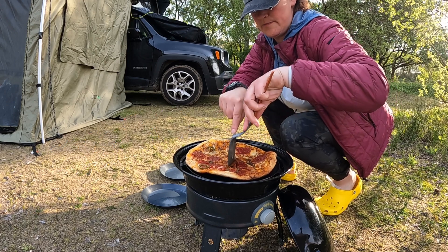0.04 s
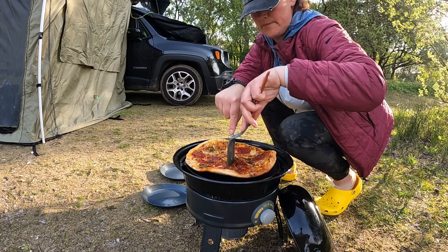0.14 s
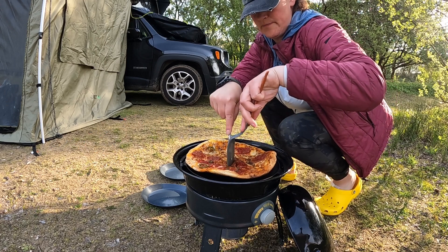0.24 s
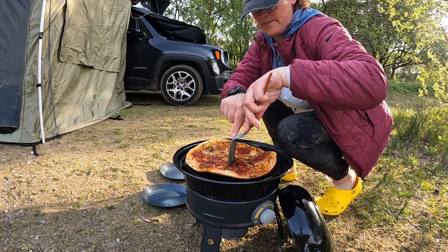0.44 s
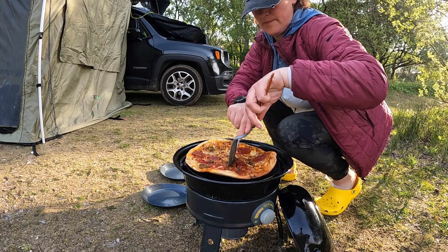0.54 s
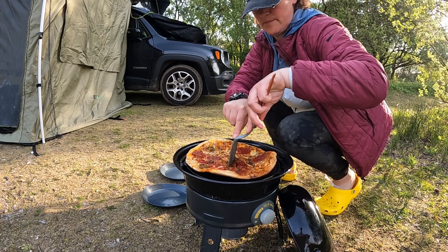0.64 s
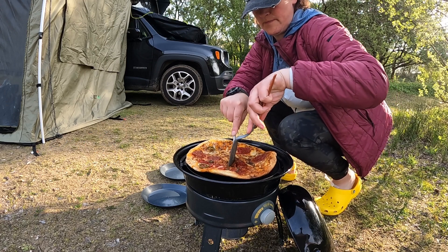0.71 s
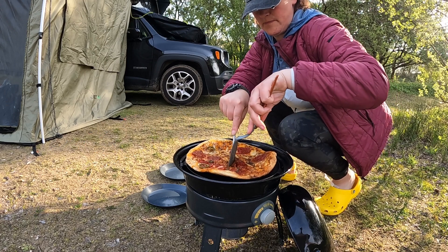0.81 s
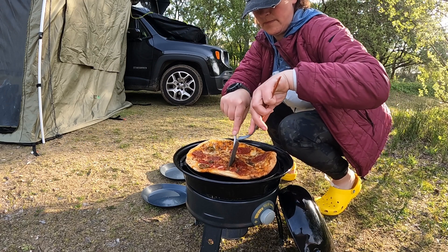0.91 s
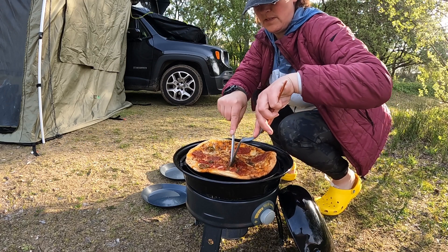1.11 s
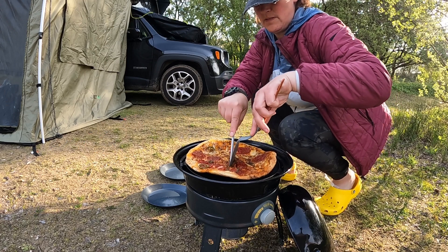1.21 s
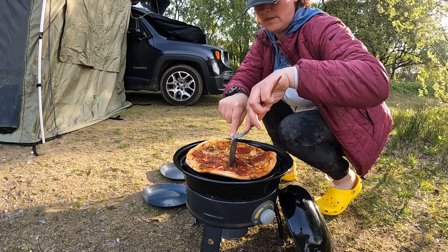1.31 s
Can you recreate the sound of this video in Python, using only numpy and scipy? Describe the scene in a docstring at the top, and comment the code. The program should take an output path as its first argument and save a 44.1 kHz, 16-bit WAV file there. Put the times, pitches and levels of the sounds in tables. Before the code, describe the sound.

A knife cracks through a hard, burnt pizza crust with sharp crunching snaps and pan knocks outdoors

```python
"""A knife is pushed through a burnt pizza on a camping grill, close to the microphone, outdoors.
The crust crackles and snaps as filtered pulses and grains; the blade rasps and knocks on the ringing pan.
Light sawing, made of the same grains, and two crumb ticks follow.
Behind lie a steady hiss of coloured noise and small birds far off, whistled as gliding sines.
A faint steady noise of opposite sign in left and right lies under it all."""
import sys
import numpy as np
from scipy import signal
from scipy.fft import rfft, irfft
from scipy.io import wavfile

SR = 44100
rng = np.random.default_rng(int(sys.argv[2]) if len(sys.argv) > 2 else 0)


def bounce(signal):
    """Save signal as a 16-bit WAV file at the path given by the first command-line argument."""
    frames = np.transpose(np.atleast_2d(signal))
    limited = np.clip(frames, -1, 1)
    pcm = np.round(limited * 32767).astype(np.int16)
    wavfile.write(sys.argv[1], SR, pcm)


N = 59535
T = np.arange(N) / SR

# Spectrum of the outdoor hiss. Each row: frequency [Hz], relative density [dB per Hz].
AIR_SPECTRUM = [(25, -16), (60, -28), (105, -23), (165, -5.5), (350, -1.5), (620, 3), (900, -1.5),
                (2300, -2), (3600, -7.5), (6500, -11), (10500, -13), (15000, -39)]
# Level of the hiss over time. Each row: time [s], level [dB].
AIR_LEVEL = [(0, -42.5), (0.2, -41), (0.42, -46.5), (0.75, -45.5), (0.92, -47), (1.02, -44.5), (1.2, -44),
             (1.35, -46.5)]
# Spectrum of the faint side noise. Each row: frequency [Hz], relative density [dB per Hz].
SIDE_NOISE_SPECTRUM = [(25, -3), (100, -8), (300, -6), (700, -13), (5000, -33), (10000, -9), (12500, 11),
                       (14500, -16)]
SIDE_NOISE_DB = -68

# Level of the crumbling in the main cut. Each row: time [s], level [dB].
CUT_LEVEL = [(0.0, -52), (0.11, -49), (0.15, -42.5), (0.2, -43), (0.223, -36.5), (0.229, -23), (0.237, -31),
             (0.241, -18.5), (0.256, -26.5), (0.273, -33), (0.277, -15), (0.287, -27.5), (0.297, -29.5),
             (0.33, -39), (0.42, -55), (0.5, -54)]
# Light sawing strokes. Each row: start [s], length before the release [s], level [dB].
STROKES = [(0.543, 0.041, -45), (0.602, 0.072, -46.5), (0.741, 0.087, -47), (1.01, 0.067, -49.5),
           (1.12, 0.074, -50.5)]
STROKE_ATTACK_S, STROKE_RELEASE_S = 0.0095, 0.016
# Colour of the crumbling crust. Each row: frequency [Hz], relative level [dB].
CRUMBLE_COLOUR = [(120, -30), (250, -12), (700, -7), (1700, -2.5), (2400, 2.5), (3200, 4.5), (4800, 1.5),
                  (7200, 1.5), (10500, -4.5), (15000, -29)]
GRAINS_PER_S, GRAIN_SPREAD_DB, GRAIN_PAN_DB = 5000, 3, -10
# Once the hard top has broken, the softer base crumbles more dully.
BREAK_S, DULLING_S, BASE_TOP_HZ, BASE_SHARE = 0.271, 0.0078, 5200, 0.54

# Rubs and catches of the blade. Each row: start [s], length [s], pitch [Hz], level [dB].
RASPS = [(0.151, 0.0077, 2240, -39), (0.163, 0.017, 2530, -44), (0.2627, 0.00425, 1474, -21),
         (0.264, 0.0057, 2400, -31), (0.2791, 0.0025, 2750, -22.5), (0.284, 0.0052, 4220, -22.5),
         (0.2845, 0.0034, 3100, -29.5), (0.488, .006, 2340, -45.5), (0.559, 0.011, 2230, -43.5),
         (0.574, 0.0055, 4850, -40), (0.625, 0.023, 3200, -50.5), (0.662, 0.0084, 4330, -45),
         (0.742, 0.02, 1440, -46), (0.762, 0.011, 2520, -46), (0.787, 0.0069, 2200, -42)]
# Colour of the rasping grit. Each row: frequency [Hz], relative level [dB].
GRIT_COLOUR = [(150, -24.5), (500, 2.5), (1600, 2), (2400, -2.5), (4800, -4.5), (7000, -13), (14000, -29)]
RASP_Q, RASP_GRIT_DB = 9, -6  # grit level is relative to the rasp's tone

# Pulses of the crust snaps and crumb ticks, some overlapping in one snap or tick.
# Each row: time [s], peak [dB], pitch [Hz], drive into the pan relative to the peak [dB].
SNAPS = [(0.2057, -16.5, 4900, 4), (0.2118, -8, 5300, 4.5), (0.2251, -10, 3540, 3.5),
         (0.2285, -25, 5000, -1), (0.2308, -34, 4500, -3), (0.235, -17, 4000, 9), (0.2387, -13, 5500, 16.5),
         (0.2411, -19, 3200, 11), (0.2448, -11.5, 3300, 13), (0.2597, -15, 3120, -25),
         (0.2610, -3, 4740, 11), (0.2613, 0.5, 2900, 1.5), (0.263, -17.5, 1980, 0), (0.302, -16.5, 3080, 4),
         (0.3127, -21, 2780, -9), (0.983, -18.5, 3040, 0), (0.9831, -19.5, 7760, -20),
         (1.0688, -15.5, 4700, -22)]
CRACK_Q, SCATTER_DB, SCATTER_T60_S = 2.61, -7, 0.015

# Knocks of the blade onto the pan. Each row: time [s], clack peak [dB], pitch [Hz], push into the thud [dB].
KNOCKS = [(0.2385, -16, 2430, -31), (0.2618, -19, 1460, -24), (0.2748, -3.5, 3130, -17),
          (0.2792, -2.5, 2650, -29.5)]
# Colour of the thud noise. Each row: frequency [Hz], relative level [dB].
THUD_COLOUR = [(100, -19), (160, -10), (220, -2), (450, 7), (650, -5), (950, 6), (1300, -7), (2500, -7),
               (6000, -16)]
THUD_T60_S, THUD_NOISE_DB, KNOCK_PAN_DB = 0.049, -8, -2
# Ringing modes of the pan and blade. Each row: frequency [Hz], level [dB], decay by 60 dB [s].
PAN_MODES = [(887.5, -34, 0.11), (1231, -36.5, 0.17), (1500, -31.5, .06), (1540, -38, 0.05),
             (2240, -41, 0.16), (2249.6, -25, 0.085), (2395, -27.5, .1), (2540, -61, 0.091),
             (2850, -38.5, 0.21), (2869, -35.5, 0.16), (3145, -34, 0.082), (3710, -48, 0.078),
             (4000, -61, 0.081), (4440, -35.5, 0.13)]
# Low modes of the grill under the pan. Each row: frequency [Hz], level [dB], decay by 60 dB [s].
GRILL_MODES = [(203, -16, 0.062), (333, -8, 0.065), (435, -30, 0.14), (583, -10.5, 0.047),
               (680, -8.5, 0.059), (891, -12.5, 0.12), (950, -16, 0.073), (1430, -18, 0.068)]

# Calls of far birds. Each row: start [s], length [s], pitch [Hz], steady glide over the call [Hz],
# closing flick [Hz], level [dB].
CHIRPS = [(0.357, 0.094, 2607, -220, -3, -46.5), (0.493, 0.053, 2600, 356, 0, -49.5),
          (0.918, 0.025, 4550, -7, 0, -51), (1.038, 0.053, 4400, 53, 0, -43),
          (1.164, 0.065, 4310, 111, 350, -46.5), (1.288, 0.061, 4440, -73, 850, -38.5)]
FLICK_POWER = 5.5  # a high power holds the flick back until the end of the call

# The microphone: two close ports, a notch, a soft top and a steep end of the band.
PORTS_DIFFER_HZ, PORTS_DIFFER_DB = 6350, -21
MIC_NOTCH_HZ, MIC_NOTCH_Q, MIC_NOTCH_SHARE = 8730, 2.53, 0.83
MIC_TOP_HZ, MIC_EDGE_HZ, CUTOFF_HZ = 8070, 20000, 15700
LEFT_RIGHT = np.array([[1], [-1]])  # opposite sign in the two channels


def from_db(db):
    """Decibels to gain."""
    return 10 ** (np.asarray(db) / 20)


def rms_one(x):
    """Scale to unit rms."""
    return x / np.sqrt(np.mean(x ** 2) + 1e-20)


def level(rows):
    """Gain over time, interpolated in dB between (s, dB) points."""
    times, db = np.transpose(rows)
    return from_db(np.interp(T, times, db))


def click(s):
    """A unit impulse at a time in seconds."""
    return (np.arange(N) == int(s * SR)) * 1.0


def dying(t60):
    """An exponential decay from time zero, falling 60 dB in t60 seconds."""
    return np.exp(-np.log(1000) * T / t60)


def through(x, response):
    """Play a sound through an impulse response."""
    return signal.fftconvolve(x, response)[:N]


def lowpass(order, hz):
    """Sections of a Butterworth low-pass."""
    return signal.butter(order, hz, fs=SR, output="sos")


def colour(x, points):
    """Causal (minimum-phase) filter with a (Hz, dB) curve and unit power gain."""
    size = 4096
    hz, db = np.transpose(points)
    grid = np.maximum(np.arange(size // 2 + 1) * SR / size, 1)
    gain = from_db(np.interp(np.log(grid), np.log(hz), db))
    # Folding the cepstrum onto positive time gives minimum phase.
    cepstrum = irfft(np.log(gain))
    cepstrum[1:size // 2] *= 2
    cepstrum[size // 2 + 1:] = 0
    response = irfft(np.exp(rfft(cepstrum)))
    return through(x, response / np.linalg.norm(response))


def modes(drive, table):
    """Ring a table of decaying sine modes, alternating in polarity."""
    response = np.zeros(N)
    for k, (hz, db, t60) in enumerate(table):
        response += (-1) ** k * from_db(db) * dying(t60) * np.sin(2 * np.pi * hz * T)
    return through(drive, response)


def air():
    """Steady outdoor hiss: coloured noise with a slowly moving level, the same in both channels."""
    return level(AIR_LEVEL) * colour(rng.standard_normal(N), AIR_SPECTRUM)


def side_noise():
    """Faint steady noise of opposite sign in left and right, strongest near 12.5 kHz."""
    side = from_db(SIDE_NOISE_DB) * colour(rng.standard_normal(N), SIDE_NOISE_SPECTRUM)
    return side * LEFT_RIGHT


def grains():
    """A dense random train of tiny fractures, a few much larger than the rest; rms 1."""
    sizes = from_db(GRAIN_SPREAD_DB * np.minimum(rng.exponential(1, N), 4))
    signs = rng.choice([-1, 1], N)
    happens = rng.random(N) < GRAINS_PER_S / SR
    return rms_one(sizes * signs * happens)


def pan(drive):
    """The pan and blade ring together."""
    return modes(drive, PAN_MODES)


def crumbling():
    """Thousands of tiny fractures under the blade, in the main cut and the sawing strokes."""
    effort = level(CUT_LEVEL)
    for s, length, db in STROKES:
        attack = np.clip((T - s) / STROKE_ATTACK_S, 0, 1)
        release = np.exp(-np.maximum(T - s - length, 0) / STROKE_RELEASE_S)
        effort = effort + from_db(db) * attack * release
    drive = effort * grains()
    crisp = colour(drive, CRUMBLE_COLOUR)
    dull = signal.sosfiltfilt(lowpass(3, BASE_TOP_HZ), crisp)
    soft = BASE_SHARE * np.clip((T - BREAK_S) / DULLING_S, 0, 1)
    return crisp + soft * (dull - crisp) + from_db(GRAIN_PAN_DB) * pan(drive)


def rasps():
    """Short bursts of slips: grit plus one resonance of the rubbed spot."""
    out = np.zeros(N)
    for s, length, hz, db in RASPS:
        swell = np.sqrt(np.abs(np.sin(np.pi * np.clip((T - s) / length, 0, 1))))
        slips = grains() * swell
        tone = signal.lfilter(*signal.iirpeak(hz, RASP_Q, fs=SR), slips + 1e-18)
        grit = colour(slips, GRIT_COLOUR)
        burst = rms_one(tone) + from_db(RASP_GRIT_DB) * rms_one(grit)
        # The root turns rms over the whole scene into rms over the burst's own length.
        out += from_db(db) * np.sqrt(length * SR / N) * burst
    return out


def crack(s, db, hz):
    """One sharp pulse of about two cycles: a band-passed click."""
    low = hz / (1 + 1 / CRACK_Q)
    high = min(hz * (1 + 1 / CRACK_Q), SR / 2 - 1)
    band = signal.butter(2, [low, high], "band", fs=SR, output="sos")
    pulse = signal.sosfilt(band, click(s) + 1e-18)
    return from_db(db) * pulse / np.abs(pulse).max()


def scatter(x):
    """Short, dense reflections from the grill bowl and the ground."""
    tail = rng.standard_normal(N) * dying(SCATTER_T60_S) * (T > .0005)
    return from_db(SCATTER_DB) * through(x, tail / np.linalg.norm(tail))


def snaps():
    """Snaps of the crust, some built from overlapping pulses; each pulse also drives the pan."""
    cracks = sum(crack(s, db, hz) for s, db, hz, _ in SNAPS)
    shakes = sum(from_db(db + drive_db) * click(s) for s, db, _, drive_db in SNAPS)
    return cracks + scatter(cracks) + pan(shakes)


def knocks():
    """The blade lands: a clack, a dull thud of the grill and the ring of the pan."""
    clacks = sum(crack(s, db, hz) for s, db, hz, _ in KNOCKS)
    pushes = sum(from_db(push_db) * click(s) for s, _, _, push_db in KNOCKS)
    strikes = sum(from_db(db + KNOCK_PAN_DB) * click(s) for s, db, _, _ in KNOCKS)
    thud_noise = through(pushes, rng.standard_normal(N) * dying(THUD_T60_S))
    thuds = from_db(THUD_NOISE_DB) * colour(thud_noise, THUD_COLOUR) + modes(pushes, GRILL_MODES)
    return clacks + scatter(clacks) + thuds + pan(strikes)


def birds():
    """Thin far whistles that swell and glide; some flick upward at the end."""
    out = np.zeros(N)
    for s, length, hz, glide_hz, flick_hz, db in CHIRPS:
        u = np.clip((T - s) / length, 0, 1)  # progress through the call
        pitch = hz + glide_hz * u + flick_hz * u ** FLICK_POWER
        whistle = np.sin(2 * np.pi * np.cumsum(pitch) / SR)
        out += from_db(db) * np.sin(np.pi * u) * whistle
    return out


def scene():
    """Every source is in the middle; a faint side noise is added with opposite sign in left and right."""
    cutting = crumbling() + rasps() + snaps() + knocks()
    return cutting + birds() + air() + side_noise()


def record(dry):
    """Two close ports that differ only in the treble, with a notch and a soft top; the band ends steeply."""
    treble = signal.butter(2, PORTS_DIFFER_HZ, "high", fs=SR, output="sos")
    slope = np.gradient(dry.mean(0))
    apart = from_db(PORTS_DIFFER_DB) * signal.sosfiltfilt(treble, slope)
    ports = dry + apart * LEFT_RIGHT
    notched = signal.lfilter(*signal.iirnotch(MIC_NOTCH_HZ, MIC_NOTCH_Q, fs=SR), ports)
    x = ports + MIC_NOTCH_SHARE * (notched - ports)
    for hz in (MIC_TOP_HZ, MIC_EDGE_HZ):
        x = signal.sosfilt(lowpass(2, hz), x)
    band_end = signal.ellip(10, .1, 80, CUTOFF_HZ, fs=SR, output="sos")  # 0.1 dB ripple, 80 dB down
    return signal.sosfilt(band_end, x)


dry = scene()
out = record(dry)
bounce(out)
```